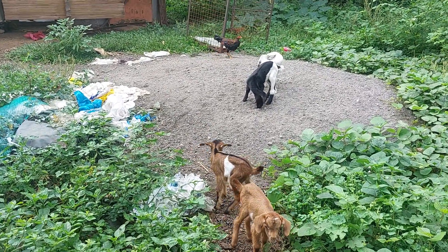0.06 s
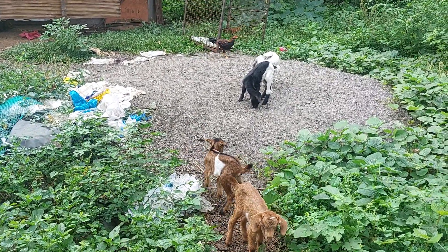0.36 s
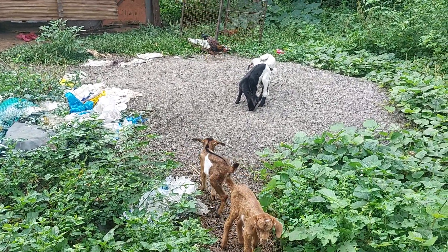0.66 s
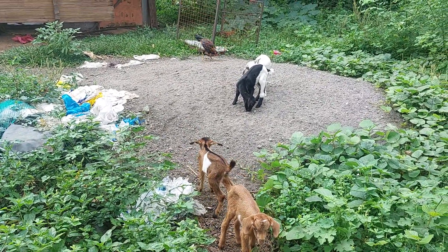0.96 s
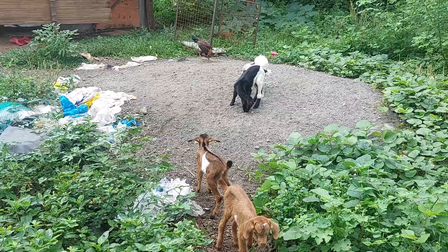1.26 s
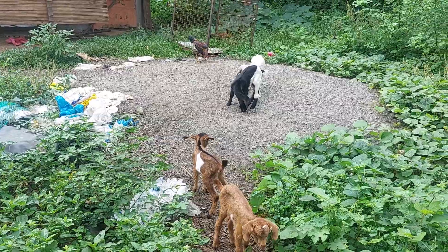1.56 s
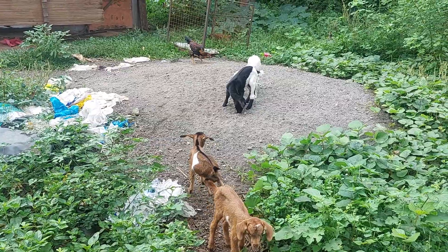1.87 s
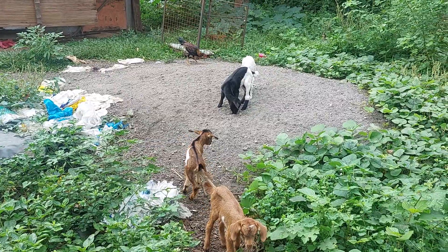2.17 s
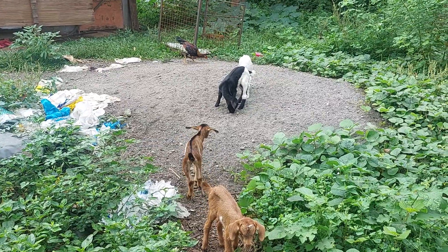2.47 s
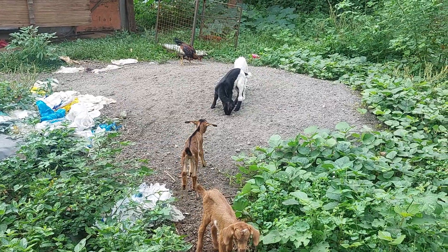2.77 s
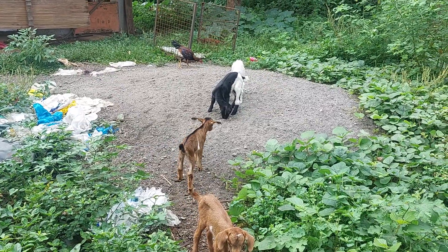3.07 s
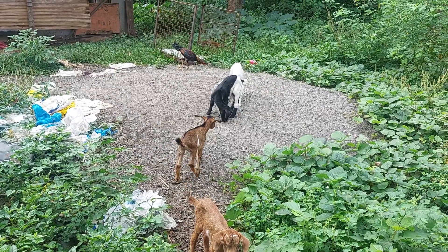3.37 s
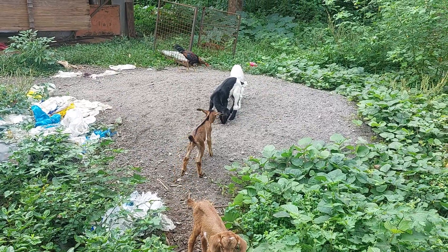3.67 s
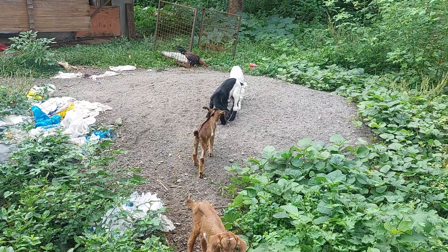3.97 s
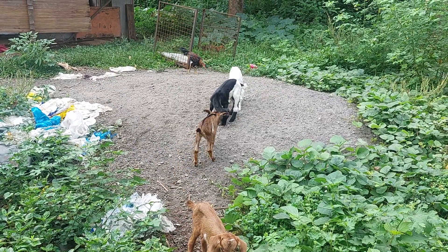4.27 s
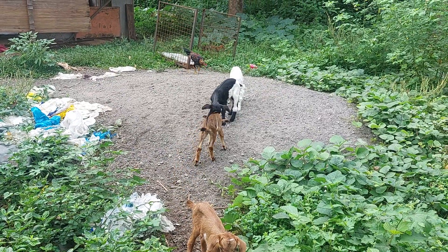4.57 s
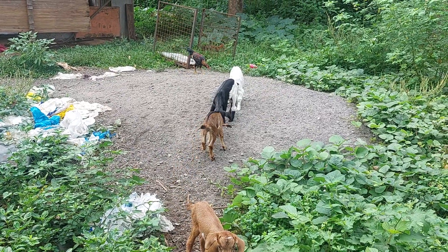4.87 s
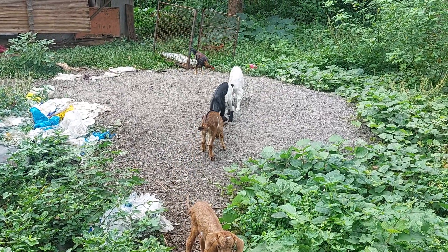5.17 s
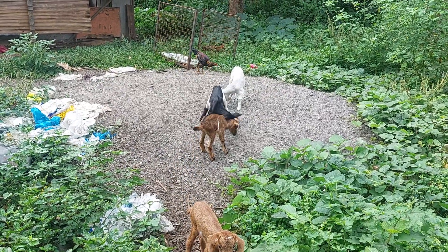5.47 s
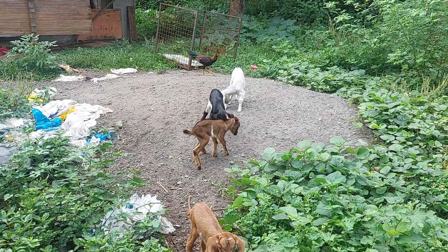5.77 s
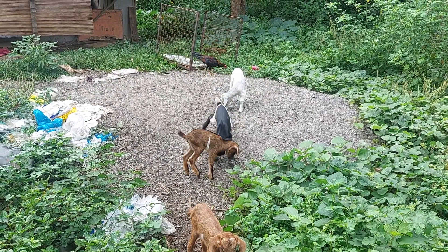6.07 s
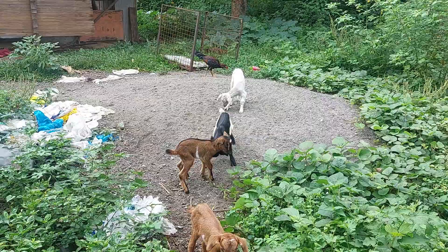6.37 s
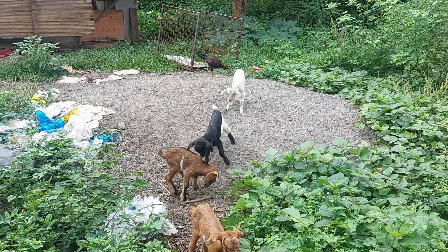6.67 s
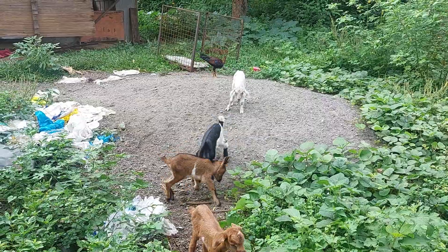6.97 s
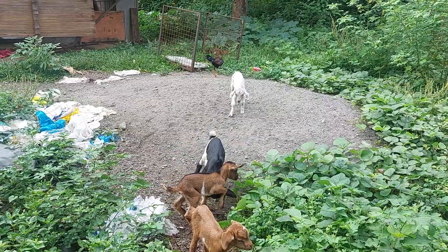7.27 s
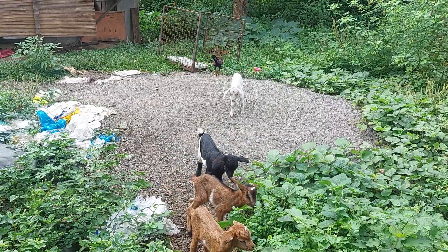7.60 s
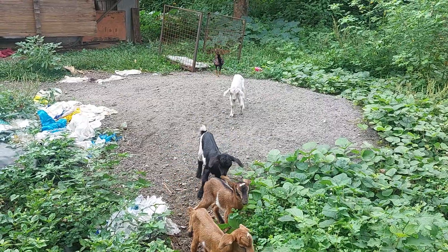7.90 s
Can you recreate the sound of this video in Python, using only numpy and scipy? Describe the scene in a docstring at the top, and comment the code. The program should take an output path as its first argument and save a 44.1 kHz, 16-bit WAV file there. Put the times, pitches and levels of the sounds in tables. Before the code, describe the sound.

A quiet, overgrown farmyard is heard in stereo from among the weeds, with a low outdoor rumble and a faint, steady, high insect buzz throughout. Right at the start, a goat kid across the yard gives a short, soft, quavering bleat. Small birds whistle and cheep faintly on the right, with a quick run of nearer chirps from about 3.5 to 4.7 seconds. Between 2 and 3.3 seconds, a few sharp, very high ticks ring, and a cricket trills faintly. A distant engine drones, swelling slightly in the middle. From about 4.8 to 6 seconds, a kid close by gives one long, loud, trembling bleat, by far the loudest sound; the background is a little quieter afterwards. The farther kid bleats more softly from 6.2 to 6.9 seconds. Leaves crackle lightly as the goats move, with a clearer rustle at around 7.3 seconds.

```python
"""Goat kids in an overgrown farmyard

A stereo microphone stands among the weeds. One kid gives a long loud bleat close by; before and after it
a softer one comes from across the yard, all quavering as the throat catches. Small birds whistle and
chirp, insects buzz, a few sharp ticks ring very high, leaves rustle as the kids push into them, and an
engine drones far off. The recorder's gain control turns down at the loud bleat and stays down."""
import sys
import numpy as np
from scipy import signal
from scipy.fft import rfft, irfft, next_fast_len
from scipy.io import wavfile
from scipy.ndimage import uniform_filter1d, map_coordinates

SR = 44100
rng = np.random.default_rng(int(sys.argv[2]) if len(sys.argv) > 2 else 0)


def to_wav(sig):
    """Store sig (one row per channel, or 1-D mono) as 16-bit WAV at the path in sys.argv[1].

    Samples outside -1..1 are clipped; the rate is SR.
    """
    pcm = np.clip(np.atleast_2d(sig), -1, 1) * 32767
    pcm = np.round(pcm).astype(np.int16)
    wavfile.write(sys.argv[1], SR, pcm.T)  # frames by channels


N = 350154
TIME = np.arange(N) / SR


def goats():
    """One kid close to the microphone, another across the yard with more scatter on its voice."""
    # Throat and nose resonances of each kid. Each row: centre in Hz, half width at ease in Hz,
    # relative level in dB, left minus right in dB.
    near_throat = [(1062.6, 81, -27.5, -1.5), (1674, 143, -21, 1.5), (2770, 306, -35.5, -9),
                   (3385, 69, -36.5, 7), (4050, 59, -41.5, -58), (4493, 300, -31.5, -10),
                   (5532, 120, -32.5, 4), (6300, 160, -34, 8.5), (7277, 202, -32, -6),
                   (9200, 310, -54.5, 12.5), (10735, 254, -50.5, -22), (11540, 290, -54, 13.5),
                   (13820, 1100, -65, -9.5)]
    far_throat = [(1043, 80, -43, -0.5), (1490, 400, -50, -1.5), (2260, 300, -53, -4),
                  (2715, 390, -57.5, -19), (3256, 202, -43.5, -8.5), (4810, 160, -48, -2),
                  (5300, 640, -50.5, -20), (6420, 450, -48, 3), (7200, 250, -47, -13),
                  (11200, 510, -70, -26)]
    # Each row: start, crest, end, attack and release in seconds, crest pitch in Hz, crest drive in dB,
    # strain at ease (0-1), strain added by the quaver (0-1).
    bleats = [(-.3, 0.131, .35, 0.11, .14, 531.6, -1.5, 0.33, .3),
              (4.769, 5.576, 6.02, 0.13, 0.14, 571.7, 6.5, 0.26, 0.78),
              (6.203, 6.428, 6.85, 0.03, .37, 551.2, 3, 0.17, .08)]
    # One quaver a bleat. Each row: first catch in seconds, catches a second, depth in dB, seconds it lasts.
    quavers = [(.018, 7.7, 6.0, .9), (4.8125, 9.57, 10.0, .61), (6.268, 7.7, 9.5, 1.0)]
    first_push, long_push, last_push = map(chest_push, bleats, quavers)
    near_folds = dict(sag=.042, jitter=.005, rasp=.011, breath_db=-22)
    far_folds = dict(sag=.026, jitter=.009, rasp=.014, breath_db=-15)
    # The near kid at the microphone. Each row: frequency in Hz, lead of the left side in radians.
    near_lead = [(0, 0), (2070, 0.28), (2330, 2), (3190, -1.5), (4310, -1.9), (5170, 0.7), (6550, -1.7),
                 (7060, 5.2), (8530, 7), (10100, 8), (10400, 4), (10900, 5.5), (12100, -7), (16000, -7)]
    near = bleat(long_push, near_throat, **near_folds, strain_db=10, widen=.43, dull=.016,
                 notch_db=16, shut_db=6, left_lead=near_lead, opening_s=4.89)
    first = bleat(first_push, far_throat, **far_folds, strain_db=1, widen=.13, dull=.47,
                  nasal_db=-9, notch_db=14)
    last = bleat(last_push, far_throat, **far_folds, strain_db=0, widen=.1, dull=.13,
                 nasal_db=-2, shut_db=5, opening_s=6.32, closing_s=6.52)
    return yard(near, wet_db=-21, t60=.16) + yard(first + last, wet_db=-7, t60=.2)


def chest_push(shape, catches, strain_eases_s=.57):
    """One breath: pitch and level rise, arch and give out; the quaver and the release strain the voice."""
    start, crest, end, attack, release, top_hz, top_db, ease, quaver_strain = shape
    t = TIME[(TIME >= start) & (TIME < end)]
    arch = ((t - crest) / np.where(t < crest, crest - start, end - crest)) ** 2
    onset = np.maximum(1 - (t - start) / attack, 0)
    ending = np.maximum(1 - (end - t) / release, 0)
    dip_db, jolt = quaver(t, *catches)
    pitch = top_hz * (1 - .088 * arch) * (1 - .26 * onset) * (1 - .4 * ending ** 4)
    pitch *= 1 + .0025 * drift(18, len(t))   # the held note wavers
    level_db = top_db - 9.5 * arch - 28.5 * onset - 26 * ending ** 3
    early = np.maximum(1 - ((t - start - attack) / strain_eases_s) ** 2, 0)
    strain = np.clip(ease + quaver_strain * early + ending ** 2, 0, 1)
    return t, pitch, level_db, strain, dip_db * (1 - onset), jolt


def quaver(t, first_s, rate, depth_db, lasts_s, edge_s=.0045, catch_share=.52):
    """The throat catches at a steady rate, ever more briefly and lightly, dipping and jolting the voice."""
    dip_db, jolt = 0, 0
    for s in np.arange(first_s, first_s + lasts_s, 1 / rate):
        vigour = max(1 - ((s - first_s) / lasts_s) ** 2, 0)
        length, catch_db = catch_share / rate * np.sqrt(vigour), depth_db * vigour
        closing, opening = np.tanh((t - s) / edge_s), np.tanh((t - s - length) / (2 * edge_s))
        dip_db += catch_db * (closing - opening) / 2
        jolt += np.exp(-((t - s - .003) / .009) ** 2)   # as it closes
        jolt += .05 * catch_db * np.exp(-((t - s - length - .006) / .009) ** 2)   # as it lets go
    return dip_db, jolt


def bleat(push, throat, sag, jitter, rasp, breath_db, strain_db, widen, dull, nasal_db=0, notch_db=0,
          shut_db=0, left_lead=[(1000, 0)], opening_s=-np.inf, closing_s=np.inf):
    """Vocal-fold harmonics sweep through throat resonances; strain widens these and roughens the voice."""
    t, pitch, level_db, strain, dip_db, jolt = push
    size, slow = len(t), slice(None, None, 32)   # the throat moves slowly
    pitch = pitch * (1 - sag * jolt) * (1 + jitter * (.2 + strain) * drift(80, size))
    phase = turns(pitch) + rasp * (.3 + .5 * strain + 2 * jolt * strain) * drift(520, size)
    centre, width, peak_db, side_db = np.transpose(throat)[:, :, None]
    nose = centre == centre.min()   # the lowest resonance stays put; the others sink as the mouth shuts
    shut = np.clip(np.maximum(opening_s - t[slow], t[slow] - closing_s) / .15, 0, 1)
    centre = centre * (1 - .19 * ~nose * shut)
    peaks = from_db(peak_db + np.where(nose, nasal_db, -shut_db * shut))
    softness_db = dip_db + np.maximum(-level_db, 0)   # a soft voice is also a dull one
    bright_db = strain_db * strain[slow] - dull * softness_db[slow] - 12 * shut
    sides = np.hstack([pan(db) for db in side_db[:, 0]])
    voice, out = np.zeros((2, size)), np.zeros((2, N))
    for k in range(1, 28):
        hz = k * pitch[slow]
        detune = (hz - centre) / (width * (1 + widen * strain[slow]))
        power = (peaks / (1 + detune ** 2)) ** 2
        treble = np.clip(hz / 8000, 0, 1.3)
        # The nasal side branch swallows one overtone.
        swallowed_db = notch_db * (1 - strain[slow]) / (1 + ((hz - 2300) / 150) ** 2)
        gains = np.sqrt(sides ** 2 @ power) * from_db(treble * bright_db - swallowed_db)
        lag = np.interp(t, t[slow], np.arctan(detune).sum(axis=0))
        angle = k * phase - lag + at_hz(left_lead, k * pitch) * [[.5], [-.5]]
        hiss = from_db(breath_db) * treble.mean() ** 2 * (1 + jolt)   # turbulence around upper harmonics
        wave = (1 + hiss * drift(700, size)) * np.cos(angle) + hiss * drift(700, size) * np.sin(angle)
        voice += np.array([np.interp(t, t[slow], g) for g in gains]) * wave
    add(out, t[0], np.sqrt(2) * voice * from_db(level_db - dip_db))
    return out


def ticks(low_hz=13060, low_t60=.12, snap_t60=.01):
    """Sharp ticks to the right of the microphone, each a dry snap and two close, beating rings."""
    # Each row: start in seconds, snap level before its band-pass in dB, upper ring in Hz, its level
    # in dB, its t60 in seconds, level of the lower, longer ring in dB.
    strikes = [(2.0654, -26.5, 13300, -26.5, 0.052, -60), (2.843, -22, 13400, -22.5, 0.034, -27),
               (2.999, -26.5, 13300, -33.5, .06, -50), (3.1516, -32.5, 13200, -54, .08, -45),
               (3.306, -48, 13300, -60, 0.028, -75)]
    out, t = np.zeros(N), TIME[:SR // 4]
    for s, snap_db, ring_hz, ring_db, t60, low_db in strikes:
        burst = rng.standard_normal(len(t)) * from_db(snap_db - 60 * t / snap_t60)
        upper = from_db(ring_db - 60 * t / t60) * np.sin(2 * np.pi * ring_hz * t)
        lower = from_db(low_db - 60 * t / low_t60) * np.sin(2 * np.pi * low_hz * t)
        add(out, s, band(burst, 4070, 5300, order=1) + (upper + lower) * (1 - np.exp(-t / .00037)))
    return yard(out * pan(-9), wet_db=-15, t60=.2)


def near_bird():
    """A bird fairly near, on the right: a slowing run of arched chirps, and harsh falling scolds."""
    # The arch of one chirp. Each row: time in seconds, pitch in Hz.
    chirp_arch = [(0, 2150), (.012, 2520), (.028, 2490), (.055, 2200)]
    # Each row: start in seconds, level in dB, rasp (0 pure, 2 harsh).
    scolds = [(2.762, -54, 2.4), (3.571, -54.5, 1.2), (3.693, -56.5, 1.1), (3.836, -48.5, 1.0),
              (3.977, -54, 1.15), (4.105, -51.5, 1.1)]
    out = np.zeros(N)
    arch, = in_time(chirp_arch, TIME[TIME < chirp_arch[-1][0]])
    for s, level_db in call_run(3.436, gap_s=.133, count=10, top_db=-49, crest_s=4.26, slowing_s=.0021):
        add(out, s, bird_note(arch, level_db, rasp=.1))
    for s, level_db, rasp in scolds:
        add(out, s, bird_note(np.geomspace(2650, 1750, int(.07 * SR)), level_db, rasp))
    return yard(out * pan(-4.5), wet_db=-12, t60=.3)


def far_birds(fall=.14, home_hz=1965, pull=.74):
    """Birds farther off on the right whistle, cheep, squeak and warble through heavy scatter."""
    # Pure falling whistles. Each row: start and length in seconds, starting pitch in Hz, level in dB.
    whistles = [(0.378, 0.091, 4780, -63), (1.11, 0.19, 4050, -67), (1.689, .22, 4080, -61.5),
                (2.876, .21, 3905, -62), (3.295, .12, 4100, -56), (3.762, .2, 4120, -54.5),
                (4.195, 0.26, 4040, -60), (7.037, .18, 4230, -62.5)]
    # Hoarse falling cheeps. Each row: start in seconds, starting pitch in Hz, level in dB.
    cheeps = [(.708, 5180, -57.5), (.89, 7200, -50.5), (2.542, 5100, -62), (3.136, 4920, -57)]
    # Squeaks that swoop up and level off. Each row: start in seconds, level in dB.
    squeaks = [(1.25, -51), (3.93, -49)]
    # Low notes sliding towards home_hz. Each row: start in seconds, starting pitch in Hz, level in dB.
    warble = [(1.568, 2400, -65), (1.635, 1810, -63.5), (1.888, 2400, -64), (1.954, 1870, -61.5),
              (2.088, 1417, -64), (2.222, 1473, -65.5), (2.328, 2880, -60), (2.6, 1605, -65.5)]
    out = np.zeros(N)
    for s, length_s, hz, level_db in whistles:
        add(out, s, bird_note(slide(hz, hz * (1 - fall), length_s), level_db, rasp=.19))
    for s, hz, level_db in cheeps:
        add(out, s, bird_note(slide(hz, hz * (1 - fall), length_s=.058), level_db, rasp=.8))
    for s, level_db in squeaks:
        add(out, s, bird_note(slide(6650, 4500, length_s=.15, bend=3)[::-1], level_db, rasp=.8))
    for s, hz, level_db in warble:
        add(out, s, bird_note(slide(hz, hz + pull * (home_hz - hz), length_s=.06), level_db, rasp=.85))
    return yard(out * pan(-4.5), wet_db=-3, t60=.2)


def bird_note(hz, level_db, rasp):
    """A bird's near-sine under a fluttering swell; rasp shakes its pitch."""
    size = len(hz)
    swell = np.sqrt(2 * np.hanning(size)) * (1 + .45 * drift(76.7, size))
    pitch = hz * (1 + .075 * rasp * drift(900, size))
    return from_db(level_db) * swell * np.sin(turns(pitch))


def insects():
    """Choirs in the weeds buzz in narrow bands, pulsed by their wing strokes."""
    # Each row: centre and width in Hz, level in dB, wing strokes a second, stroke depth (0-1),
    # left minus right in dB.
    choirs = [(6733, 690, -57, 26, .2, -2), (7677, 700, -55, 20, 0.1, -2.5),
              (10966, 730, -57, 110, 0.2, -4.5), (10150, 700, -66.5, 160, .4, -0.5),
              (4986, 880, -62.5, 32, 0.2, -6.5)]
    out = np.zeros((2, N))
    for hz, width, level_db, strokes, depth, side_db in choirs:
        mid, side = band(rng.standard_normal((2, N)), hz - width / 2, hz + width / 2, order=3)
        pulse = 1 + depth * np.sin(turns(strokes * (1 + .014 * drift(8))))
        buzz = rms_one(pulse * (mid + side * [[1], [-1]]))
        out += pan(side_db) * from_db(level_db + .5 * drift(14)) * buzz
    return out


def cricket(strokes_per_s=30, hz=5300, trill_s=.115):
    """One cricket gives a run of short trills; each stroke slows as it ends, so its pitch falls."""
    out = np.zeros(N)
    stroke = TIME[TIME < trill_s] * strokes_per_s % 1
    pulses = 2 * np.sin(np.pi * stroke) ** 4
    for s, level_db in call_run(2.41, gap_s=.211, count=7, top_db=-59, crest_s=3.24):
        pitch = hz * (1 - .064 * (stroke - .5) + .0245 * drift(723, len(stroke)))
        add(out, s, from_db(level_db) * pulses * np.sin(turns(pitch)))
    return pan(-2) * out


def rustle(grains_per_s=1800, walk_s=(1.96, 6.6), walk_db=-63, edge_s=.5, attack_s=.049, decay_s=.097):
    """Leaves and dry litter crackle in clumps: steadily under a walking kid, flaring at each brush."""
    # A kid brushes through leaves. Each row: peak time in seconds, level in dB.
    brushes = [(.02, -55), (1.05, -69), (1.82, -60), (6.15, -61), (7.26, -48.5), (7.46, -57)]
    # The colour of the leaves. Each row: frequency in Hz, relative level in dB.
    leaf_spectrum = [(200, -1.5), (700, -2), (1500, 1), (4800, 7), (9000, -3.5), (15500, -4)]
    walking = (np.tanh((TIME - walk_s[0]) / edge_s) - np.tanh((TIME - walk_s[1]) / edge_s)) / 2
    level = from_db(walk_db) * walking
    for s, db in brushes:
        level += from_db(db) * np.exp(-np.maximum((s - TIME) / attack_s, (TIME - s) / decay_s))
    born = rng.random(N) < grains_per_s * from_db(4 * drift(45)) / SR
    grains = born * (rng.standard_normal(N) + .5 * rng.standard_normal((2, N)))
    return pan(-7) * level * coloured(grains, leaf_spectrum)


def engine(base_db=-67, swell_db=13, swell_s=1):
    """A far engine eases off, then gathers speed; each of its tones swells for a while as it goes by."""
    # Each row: time in seconds, firings a second.
    speed = [(0, 81), (2.8, 76.2), (4.0, 81.5), (7.94, 87.5)]
    # Each row: multiple of the firing rate, level against base_db in dB, crest of its swell in seconds.
    orders = [(1, 4, 2.39), (4, -3.5, 4.8), (5, 0.5, 3.58), (6, -3.5, 3.38), (9, -15.5, 3.2)]
    rate, = in_time(speed)
    phase = turns(rate * (1 + .008 * drift(20)))
    drone = np.zeros(N)
    for k, db, crest_s in orders:
        swell = np.exp(-((TIME - crest_s) / swell_s) ** 2)
        drone += from_db(db + swell_db * swell + 2 * drift(6.4)) * np.sin(k * phase)
    return pan(.46) * from_db(base_db) * drone


def air(level_db=-48):
    """Open air: distant rumble and soft hiss, alike on both sides of the microphone in the deep bass."""
    # Each row: frequency in Hz, relative level in dB.
    spectrum = [(25, -34.5), (40, -11.5), (55, 4.5), (90, 0.5), (130, -9.5), (200, -17), (420, -17),
                (560, -24), (900, -20.5), (1300, -33), (2600, -36.5), (5000, -36), (9000, -44),
                (15500, -45.5)]
    # Each row: frequency in Hz, left minus right in dB.
    balance = [(60, -1), (110, 0.5), (200, 7), (400, 3), (1000, 0.5), (2400, -3), (5000, -14.5),
               (9000, 0.5), (13000, -2.5)]
    # Each row: frequency in Hz, likeness of left and right (0-1).
    likeness = [(50, 1), (160, 0.56), (400, 0.65), (1500, 0.077), (12000, 0.72)]
    size = next_fast_len(N)
    hz = np.fft.rfftfreq(size, 1 / SR)
    mid, side = rfft(rng.standard_normal((2, size)))
    alike, sides = at_hz(likeness, hz), np.array([[1], [-1]])
    pair = np.sqrt(1 + alike) * mid + np.sqrt(1 - alike) * side * sides
    pair *= from_db(sides * at_hz(balance, hz) / 2)
    return from_db(level_db) * coloured(irfft(pair, size)[:, :N], spectrum)


def yard(x, wet_db, t60):
    """Direct sound plus diffuse scatter from leaves and sheds, different on each side."""
    t = np.arange(SR // 2) / SR
    tail = band(rng.standard_normal((2, len(t))), 400, 4200, order=1)
    tail *= from_db(-60 * t / t60) * (1 - np.exp(-t / .036))
    tail /= np.sqrt(np.sum(tail ** 2) / 2)
    return x + from_db(wet_db) * signal.fftconvolve(x, tail, axes=1)[:, :N]


def slide(from_hz, to_hz, length_s, bend=1.3):
    """Pitch of a note that glides, slowly at first."""
    return from_hz + (to_hz - from_hz) * np.linspace(0, 1, int(length_s * SR)) ** bend


def call_run(first_s, gap_s, count, top_db, crest_s, slowing_s=0, fade_db=9):
    """Start and level of repeated calls: gaps grow by slowing_s; fade_db down one second off the crest."""
    k = np.arange(count)
    s = first_s + gap_s * k + slowing_s * k * (k - 1) / 2
    return zip(s, top_db - fade_db * (s - crest_s) ** 2)


def from_db(db):
    """Decibels to gain."""
    return 10 ** (np.asarray(db) / 20)


def rms_one(x):
    """Scale to rms 1."""
    return x / np.sqrt(np.mean(x ** 2) + 1e-20)


def in_time(rows, t=TIME):
    """The columns of a curve at the times t."""
    s, *columns = np.transpose(rows)
    return [np.interp(t, s, c) for c in columns]


def at_hz(points, hz):
    """Read a spectrum on a log-frequency axis."""
    point_hz, values = np.transpose(points)
    return np.interp(np.log(hz + 1), np.log(point_hz), values)


def pan(db):
    """Left and right gains for a level difference; their mean is 1."""
    gains = from_db(np.array([[db], [-db]]) / 2)
    return gains / gains.mean()


def drift(rate, size=N):
    """Smooth random motion of spread near 1, through `rate` random values a second."""
    knots = rng.standard_normal(int(size * rate / SR) + 4)
    return map_coordinates(knots, [np.arange(size) * rate / SR + 1], order=2, mode="nearest")


def turns(hz):
    """Running phase of a moving frequency, in radians."""
    return 2 * np.pi * np.cumsum(hz) / SR


def band(x, low_hz, high_hz, order=2):
    """Butterworth band-pass."""
    sos = signal.butter(order, [low_hz, min(high_hz, SR * .45)], "band", fs=SR, output="sos")
    return signal.sosfilt(sos, x)


def coloured(x, spectrum):
    """Give a noise a spectrum; rms 1."""
    size = next_fast_len(N)
    gains = from_db(at_hz(spectrum, np.fft.rfftfreq(size, 1 / SR)))
    return rms_one(irfft(rfft(x, size) * gains, size)[..., :N])


def add(out, s, sound):
    """Mix a sound in at time s."""
    start = max(int(s * SR), 0)
    out[..., start:start + sound.shape[-1]] += sound[..., :N - start]


def scene():
    """The whole yard as it reaches the microphone."""
    return goats() + ticks() + near_bird() + far_birds() + insects() + cricket() + rustle() + engine() + air()


def record(dry, threshold_db=-19, slope=.48, sink_db_per_s=.16, cutoff_hz=15800):
    """The gain sinks slowly throughout, drops fast on a loud sound and stays down; the top is cut."""
    power = uniform_filter1d(np.mean(dry ** 2, axis=0), SR // 100)
    level_db = 10 * np.log10(np.maximum(power, 1e-12))
    over_db = slope * np.maximum(level_db - threshold_db, 0)
    sink_db = sink_db_per_s * TIME
    held_db = np.maximum.accumulate(over_db - sink_db) + sink_db
    ducked = dry * from_db(-uniform_filter1d(held_db, SR // 100))
    return signal.sosfilt(signal.ellip(10, .1, 80, cutoff_hz, fs=SR, output="sos"), ducked)


dry = scene()
out = record(dry)
to_wav(out)
```